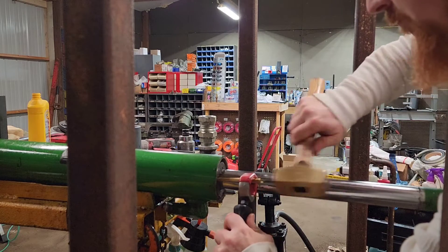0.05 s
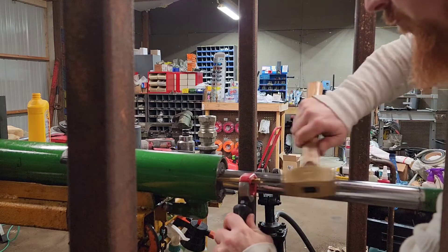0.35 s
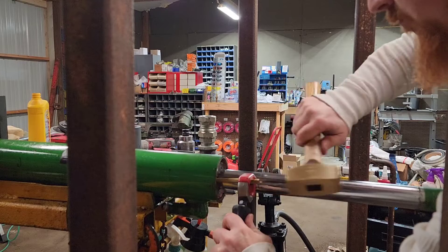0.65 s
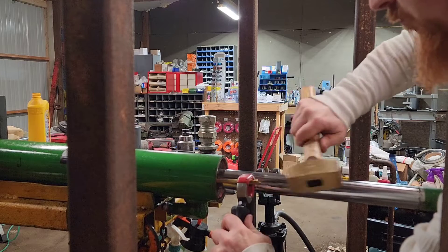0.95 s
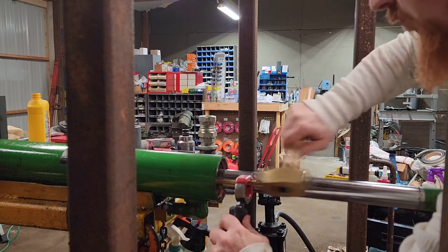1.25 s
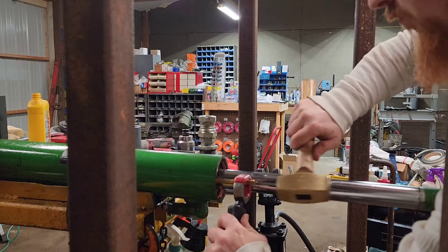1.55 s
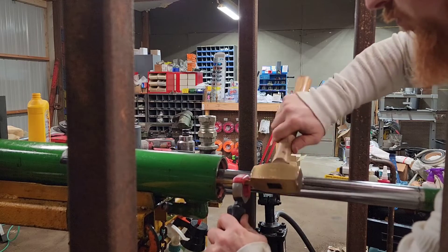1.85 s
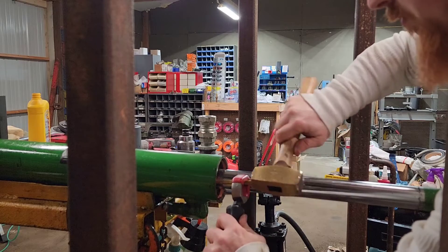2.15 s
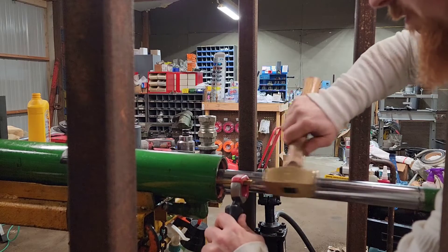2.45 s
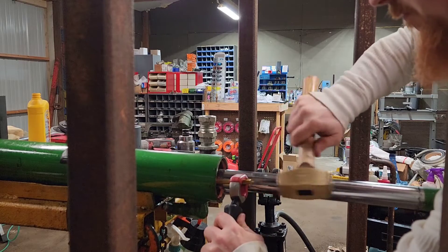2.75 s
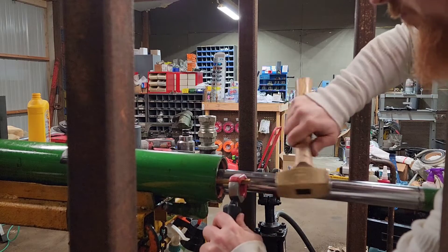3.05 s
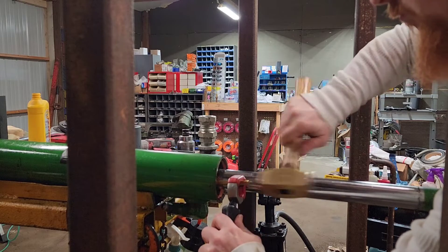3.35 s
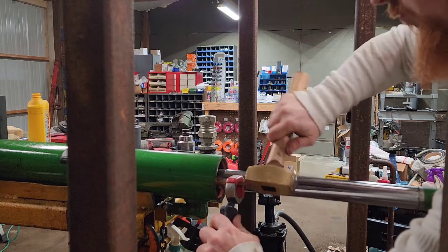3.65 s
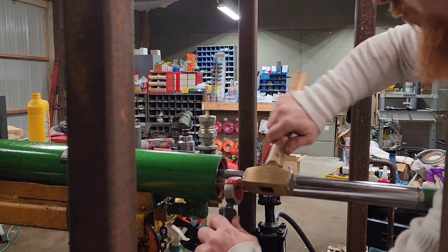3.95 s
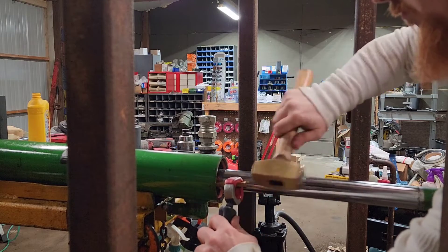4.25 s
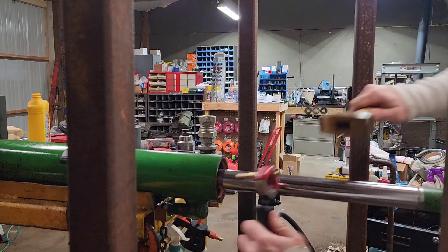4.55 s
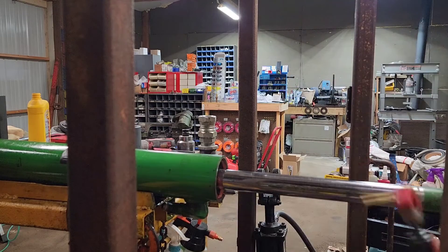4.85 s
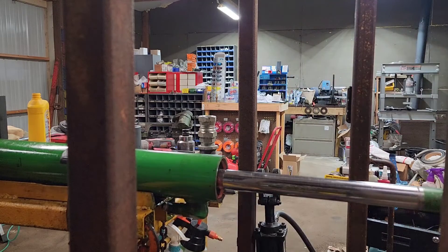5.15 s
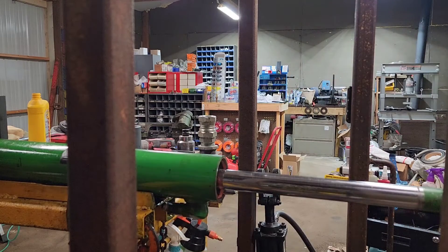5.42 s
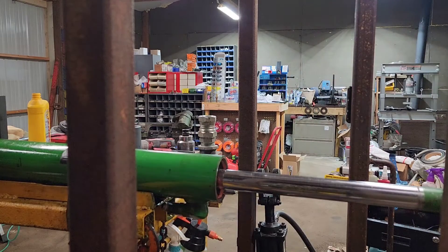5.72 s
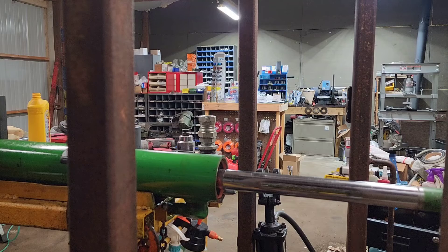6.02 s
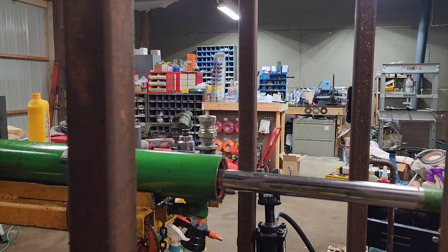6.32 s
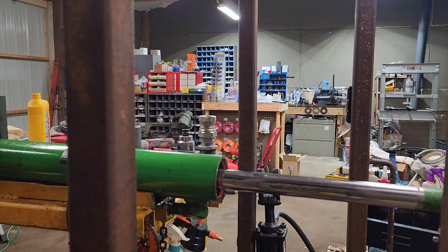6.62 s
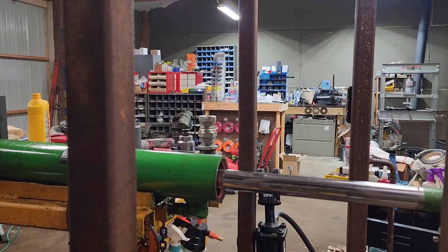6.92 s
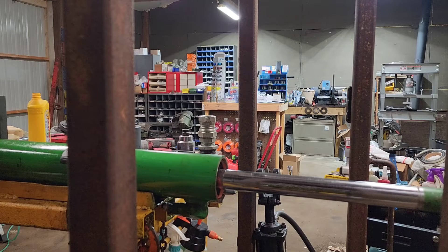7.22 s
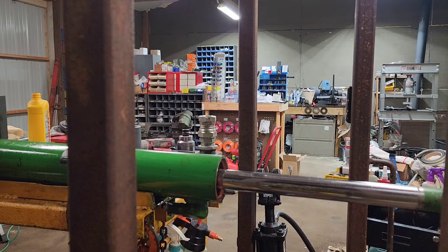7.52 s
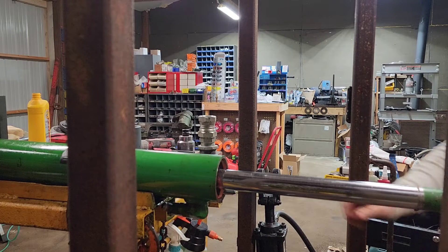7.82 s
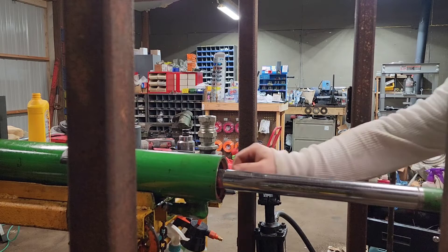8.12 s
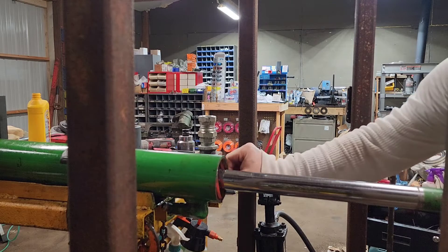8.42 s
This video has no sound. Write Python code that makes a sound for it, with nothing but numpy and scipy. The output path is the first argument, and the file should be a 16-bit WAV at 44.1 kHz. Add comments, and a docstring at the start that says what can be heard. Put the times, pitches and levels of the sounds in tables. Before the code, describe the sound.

A brass hammer strikes a hydraulic cylinder close in front of the microphone, about four blows a second, in two runs with a brief break. Each blow clacks and the steel rod pings, echoing in a hard-walled workshop. After a softer last tap it gets much quieter: off to the right, tools tap, the hammer knocks down on wood, feet shuffle and a hand rubs the rod over faint hiss.

```python
"""A hard-walled workshop, a stereo pair of microphones facing a hydraulic cylinder. A brass hammer
drives at its gland in two quick runs. A blow is a dull contact and, usually a moment later, a metallic
clack; the steel rod pings and the room answers. Then, off to the right and much quieter, tools are put
down, feet shuffle, and a hand rubs along the rod. Room tone and a fine hiss lie under it all."""
import sys
import numpy as np
from scipy import signal
from scipy.fft import rfft, irfft
from scipy.io import wavfile
from scipy.ndimage import uniform_filter1d

SR = 44100
rng = np.random.default_rng(int(sys.argv[2]) if len(sys.argv) > 2 else 0)


def digitize_waveform(pressure):
    """Quantize a signal to 16-bit integers and store it at the path in sys.argv[1].

    Rows of a 2-D input are taken as channels; values are limited to [-1, 1].
    """
    field = np.atleast_2d(pressure).T
    bounded = np.clip(field, -1, 1)
    quanta = np.round(bounded * 32767).astype(np.int16)
    wavfile.write(sys.argv[1], SR, quanta)


N = 382788
TIME = np.arange(32768) / SR  # seconds within one impact
HZ = np.fft.rfftfreq(len(TIME), 1 / SR)


def amp(db):
    """Decibels to gain."""
    return 10 ** (np.asarray(db) / 20)

def read(points, hz):
    """Each value column of a table, interpolated on a log-frequency axis."""
    f, *columns = np.transpose(points)
    return np.array([np.interp(np.log(hz + 1), np.log(f + 1), c) for c in columns])

def add(mix, s, sound):
    """Lays a stereo sound into the mix at s seconds; one that began before zero leaves only its tail."""
    start = round(s * SR)
    part, sound = mix[:, max(start, 0):], sound[:, max(-start, 0):]
    part[:, :sound.shape[1]] += sound[:, :part.shape[1]]

def unit(x):
    """Scales a sound to an rms of about 29.7, the square root of the number of samples in 20 ms."""
    return x / np.sqrt(np.sum(x ** 2) / len(x) / (SR / 50))

def fade(t60):
    """Exponential decay, 60 dB down after t60 seconds."""
    return np.exp(-np.log(1000) * TIME / t60)

def causal(gain):
    """Minimum-phase response for a magnitude: everything rings after the impact."""
    log_gain = np.log(np.maximum(gain, 1e-5))
    mirrored = np.concatenate([log_gain, log_gain[..., -2:0:-1]], -1)
    return np.exp(np.conj(signal.hilbert(mirrored)))[..., :len(HZ)]

# Diffuse sound at the two microphones. Each row: frequency in Hz, likeness from 0 to 1.
MIC_LIKENESS = [(60, 1), (250, 0.9), (500, 0.77), (850, 0.24), (1500, 0.02), (16000, 0.09)]
def noise(spectrum, size):
    """Coloured noise of rms 1, alike at both microphones in the bass and unrelated in the treble."""
    hz = np.fft.rfftfreq(size, 1 / SR)
    left, unrelated = rfft(rng.standard_normal((2, size)))
    same = read(MIC_LIKENESS, hz)[0]
    right = same * left + np.sqrt(1 - same ** 2) * unrelated
    pair = irfft(np.array([left, right]) * amp(read(spectrum, hz)), size)
    return pair / pair.std()

def burst(spectrum, rise_s, t60):
    """A crowd of modes too dense to tell apart, dying together."""
    return unit(noise(spectrum, len(TIME)) * fade(t60) * (1 - np.exp(-TIME / rise_s)))

def modes(table, scatter_db):
    """Dying sines; strength varies from hit to hit, and high ones reach the microphones out of step."""
    out = np.zeros((2, len(TIME)))
    for hz, db, t60 in table:
        skew = rng.uniform(-np.pi, np.pi) * (1 - read(MIC_LIKENESS, hz)[0])
        phase = 2 * np.pi * (hz * TIME + rng.random())
        out += amp(db + scatter_db * rng.standard_normal()) * fade(t60) * np.sin([phase, phase + skew])
    return out * (1 - fade(.004))

# How long the hard walls hold a sound. Each row: frequency in Hz, t60 in seconds.
WORKSHOP_T60 = [(60, 0.79), (160, 0.67), (400, 0.29), (1000, 0.49), (2000, 0.52), (3600, 0.47),
                (6000, 0.45), (11500, 0.25), (16000, 0.29)]
def reverb(spectrum, rise_s):
    """The workshop's diffuse tail builds up, each band dying at its own speed."""
    hz, t, bands = signal.stft(noise(spectrum, len(TIME)), SR, nperseg=256)
    decay = np.exp(-np.log(1000) * t / read(WORKSHOP_T60, hz).T)
    tail = signal.istft(bands * decay, SR, nperseg=256)[1]
    return unit(tail[:, :len(TIME)] * (1 - np.exp(-TIME / rise_s)))

def blow_force(bright_db, delay_s, clack_db, soft_hz=4100, hard_hz=3300, pivot_hz=1500, rebound_db=-8):
    """Spectra of the impacts in a blow: a soft contact, then the hard clack as the steel parts meet."""
    contact = causal(1 / np.sqrt(1 + (HZ / soft_hz) ** 14))
    clack = amp(rebound_db) + amp(clack_db) / (1 + (hard_hz / (HZ + 1)) ** 4)
    tilt = causal(amp(bright_db * .5 * np.tanh(2 * np.log((HZ + 1) / pivot_hz))))
    if delay_s < .001:  # parts already touch: one impact
        return [tilt * causal(np.hypot(abs(contact), clack))]
    delay = np.exp(-2j * np.pi * HZ * round(delay_s * SR) / SR)
    return [tilt * contact, tilt * causal(clack) * delay]

# Straight from the struck parts to the microphones. Each row: frequency in Hz, left and right in dB.
CRACK_SPECTRUM = [(63.8, -37, -41), (256, -5.5, -11.5), (648, -20.5, -14), (1130, 3, -12.5),
                  (1570, -2, -17.5), (2000, -1, 4.5), (2750, -18.5, -8.5), (3690, -14, -2),
                  (5180, -15, -28), (7430, -15.5, -25), (9200, -34.5, -38), (11200, -9.5, -1),
                  (13786, -14.5, -10), (15240, -28, -9.5)]
def crack(spread_s=0.001294, knee_hz=900, blunt_hz=6500):
    """Direct sound of a blow; bending waves cross the steel faster the higher their pitch."""
    lateness = spread_s / np.sqrt(1 + HZ / knee_hz)
    dispersion = np.exp(-2j * np.pi * np.cumsum(lateness - lateness[-1]) * HZ[1])
    blunt = 1 / np.sqrt(1 + (HZ / blunt_hz) ** 4)
    return unit(irfft(causal(amp(read(CRACK_SPECTRUM, HZ)) * blunt) * dispersion))

# The cylinder's modes. Each row: frequency in Hz, level in dB, t60 in seconds.
BARREL_MODES = [(158.1, -7.5, 0.72), (269, -12, 0.46), (543, -9, 0.45), (698, -10, .4), (729, -7, 0.58),
                (848, -8, 0.32), (928, -12.5, .45), (1070, -5, 0.34), (1117, -7.5, 0.42), (1380, -2, 0.35),
                (1520, -6, 0.56), (3424, -10.5, 0.74), (3573, -13, .45), (5440, -21, .3)]  # barrel and stand
ROD_MODES = [(1982, 0.5, 0.08), (1975, -12, 0.43), (1216, -6.5, 0.16), (355.6, -14, 0.082),
             (2300, -4.5, 0.036), (3617, -8.5, .04)]
# The rod's lingering ring, blurred by the room. Each row: frequency in Hz, level in dB.
ROD_SPECTRUM = [(1500, -37), (1850, -19.5), (1945, 2), (1970, 12), (2020, -13.5), (2120, -13), (2700, -50)]
# The rod rings more freely as the gland is driven along it. Each row: time in seconds, gain in dB.
ROD_GAIN = [(2.45, -8), (2.95, 2.5), (3.5, 4.5), (3.78, 10.5), (4.32, 5.5)]
def cylinder_ring(s):
    """Barrel and rod ring on after a blow at s seconds."""
    ping = amp(-20) * modes(ROD_MODES, scatter_db=2)
    linger = amp(-32) * burst(ROD_SPECTRUM, rise_s=0.0043, t60=.4)
    freedom = amp(np.interp(s, *np.transpose(ROD_GAIN)))
    return amp(-31) * modes(BARREL_MODES, scatter_db=2.24) + freedom * (ping + linger)

# Blows in front of the microphones, the first already dying away. Each row: start in seconds, force in
# dB, brightness in dB, clack delay in seconds, clack in dB, direct sound in dB, bite in dB.
HAMMER_BLOWS = [(-.18, 1, 0, 0.0025, 0, -3, -5), (0.0835, 2.5, 2, 0.0017, -3, -6.5, 5),
                (0.3725, -1, -1.5, 0.00024, -15, 2, -1.5), (0.6299, 1, 1.5, 0, -0.5, -2.5, -6),
                (0.889, 0, 1.5, 0, -4, -1, -2), (1.1414, -0.5, 1.5, 0.0017, -6.5, 1, -3.5),
                (1.3896, 1, 2, 0.004, -2, 1.5, 7), (1.9576, -3, 0.8, 0, -6.5, 2, -6),
                (2.219, 0, 2, 0.0008, -1, 1.5, 1), (2.473, 0, 2.5, 0.0021, 2, -1.5, 5),
                (2.7289, -1, 2, 0.0036, 1, 2, -1), (2.9852, -1, 0, .0070, -1, 2.5, 5),
                (3.2419, -3, -1.5, 0, 4.5, -2, -8.5), (3.505, -1.5, 5, 0.0011, -7.5, 2.5, 1),
                (3.7684, -1, 2.5, 0.0075, -2, 3.5, 1), (4.038, -2.5, 0.5, 0.0011, -2.5, -2, -1.5),
                (4.322, -10.5, 0, 0.002, -26, 8, -2)]
# Stiff, damped modes of hammer head and gland. Each row: frequency in Hz, level in dB, t60 in seconds.
HEAD_MODES = [(698, -14, 0.067), (1043, 4, 0.12), (1310, -12, 0.057), (1532, -8, 0.07), (2350, -10, 0.029),
              (2390, 1.5, 0.032), (3380, -30, 0.014)]
# A blow's noise, from near to far. Each row: frequency in Hz, left and right microphone in dB.
CHATTER_SPECTRUM = [(198, -15.5, -8), (1135, 0, -7.5), (2110, 4.5, 5), (3650, -7, -9.5), (5040, -11, -18),
                    (10000, -22, -25), (11120, -11.5, -8), (15700, -28, -18)]  # the faces, just after they meet
CLATTER_SPECTRUM = [(60.0, -25.5, -27.5), (200.0, -8, -16.5), (590, -12, -16), (810, -6.5, -28),
                    (1130, 2.5, 2), (1610, 1.5, -18.5), (2040, -2, -1.5), (2740, -22, -10),
                    (3830, -16, -13), (4940, -10, -21), (10040, -32, -33), (11270, -12.5, -6.5),
                    (12900, -31, -27), (15370, -34, -26)]  # gland, barrel and nearby surfaces
ECHO_SPECTRUM = [(38.7, -22, -14.5), (68.6, -15, -15), (185, -5.5, -7), (395, -6, -8.5), (639, -4.5, -4),
                 (754, 2, -1), (1110, 0.5, -0.5), (1780, -11, -7), (1950, -3, -2), (2900, -13, -9.5),
                 (3660, -11, -6.5), (4770, -15.5, -23), (9500, -31, -30.5), (11370, -18, -12.5),
                 (15670, -45.5, -26)]  # the workshop's answer
def hammering(bite_hz=3060, bite_octaves=.22, echo_repeat=.7):
    """Brass strikes the gland: each impact drives crack, clatter and room, and the cylinder rings."""
    out = np.zeros((2, N))
    # contact and clack sound from different places, each with its own echo
    spot_echoes = [reverb(ECHO_SPECTRUM, rise_s) for rise_s in (0.0035, 0.0053)]
    fade_out = np.clip((.7 - TIME) / .1, 0, 1)
    # bite: a narrow band that is strong or weak with the spot that is struck
    bite_band = np.exp(-(np.log2((HZ + 1) / bite_hz) / bite_octaves) ** 2)
    for s, force_db, bright_db, delay_s, clack_db, direct_db, bite_db in HAMMER_BLOWS:
        directness = causal(amp(direct_db + bite_db * bite_band))
        impacts = blow_force(bright_db, delay_s, clack_db - force_db)
        for force, spot_echo in zip(impacts, spot_echoes):
            # the hammer lands near the same spot, so the echo pattern partly repeats
            fresh_echo = reverb(ECHO_SPECTRUM, rise_s=0.0033)
            echo = echo_repeat * spot_echo + np.sqrt(1 - echo_repeat ** 2) * fresh_echo
            chatter = amp(-23) * burst(CHATTER_SPECTRUM, rise_s=0.0006, t60=0.018)
            head = amp(-22) * modes(HEAD_MODES, scatter_db=2.8)
            clatter = amp(-21) * burst(CLATTER_SPECTRUM, rise_s=0.00039, t60=0.19)
            near = directness * rfft(amp(-21) * crack() + chatter + head)
            far = rfft(clatter + amp(-19) * echo)
            add(out, s, amp(force_db) * fade_out * irfft((near + far) * force))
        add(out, s, amp(force_db) * cylinder_ring(s))
    return out

# The quiet workshop, all round the microphones. Each row: frequency in Hz, relative level in dB.
AIR_SPECTRUM = [(15, -15), (25, -1), (92, -3), (217, -13.5), (405, -10.5), (840, -10), (1070, -12),
                (1790, -3), (2840, -15), (3620, -9.5), (5880, -15), (7710, -8), (8830, -19.5), (11900, 1.5),
                (16000, -10)]
def room_tone(split_hz=5500, tone_db=-52.5, hiss_db=-61, lift_db=3, lift_at_s=5.5, lift_length_s=0.2):
    """Steady room tone below; above it a fine hiss that comes up once and stays."""
    air = noise(AIR_SPECTRUM, N)
    tone = signal.sosfiltfilt(signal.butter(2, split_hz, fs=SR, output="sos"), air)
    lift = np.clip((np.arange(N) / SR - lift_at_s) / lift_length_s, 0, 1)
    return tone * amp(tone_db) + (air - tone) * amp(hiss_db + lift_db * lift)

# Small metal parts, off to the side. Each row: start in seconds, level in dB.
METAL_CLICKS = [(1.89, -63.5), (7.507, -57.5), (7.537, -49), (7.7732, -48), (8.245, -48), (8.247, -48),
                (8.462, -51.5)]
# Their tick. Each row: frequency in Hz, level in dB.
CLICK_SPECTRUM = [(400, 10.5), (1500, -6.5), (2400, 2), (3700, 0.5), (5500, -2), (9000, -25.5),
                  (12000, -11), (16000, -14)]
# Their ring. Each row: frequency in Hz, level in dB, t60 in seconds.
PART_MODES = [(2580, -6, 0.065), (3920, -3, .08), (5360, -1, .09)]
def clicks(gain_db=2):
    """Metal parts touch: a sharp tick, a brief ring and a short echo."""
    out = np.zeros((2, N))
    for s, db in METAL_CLICKS:
        tick = burst(CLICK_SPECTRUM, rise_s=0.0001, t60=.014)
        ring = amp(-7) * modes(PART_MODES, scatter_db=3.2)
        echo = amp(-12) * reverb(CLICK_SPECTRUM, rise_s=0.0036)
        add(out, s, amp(db + gain_db) * (tick + ring + echo))
    return out

# A floor thud, a hollow knock and a small tick. Each row: frequency in Hz, level in dB.
THUD_SPECTRUM = [(25, -60), (45, -45), (72, -7), (110, -20), (135, -10.5), (158, 3.5), (195, -16),
                 (255, -11), (340, -21), (600, -46.5)]
KNOCK_SPECTRUM = [(40, -41), (100, -24), (230, -10), (340, -6.5), (520, -5), (750, -8.5), (1100, -14.5),
                  (1600, -18.5), (4000, -63.5)]
TICK_SPECTRUM = [(500, -18.5), (1500, 5.5), (3600, 3), (5500, -5), (9000, -17), (12000, -18), (16000, -48)]
def bump(thud_db, knock_db, tick_db, rise_s, t60):
    """A soft impact: thud, hollow knock and tick, each with its echo."""
    parts = ((THUD_SPECTRUM, thud_db), (KNOCK_SPECTRUM, knock_db), (TICK_SPECTRUM, tick_db))
    return sum(amp(db) * (burst(spectrum, rise_s, t60) + amp(-9) * reverb(spectrum, rise_s=0.014))
               for spectrum, db in parts)

# Handling beside the microphones. Each row: start in seconds, knock in dB, tick in dB.
TOOL_TAPS = [(4.61, -47, -54.5), (4.635, -49.5, -53.5), (4.853, -57, -71), (5.653, -47.5, -49.5),
             (6.038, -50, -68), (6.198, -55, -60), (6.584, -41.5, -55.5), (7.211, -53, -64.5),
             (7.776, -52, -46), (8.237, -39.5, -45)]
def taps(thud_offset_db=-11.5):
    """Tools and hand knock lightly against things."""
    out = np.zeros((2, N))
    for s, knock_db, tick_db in TOOL_TAPS:
        add(out, s, bump(knock_db + thud_offset_db, knock_db, tick_db, rise_s=0.0032, t60=0.25))
    return out

# Soles, sleeve and hand, faint. Each row: start in seconds, length in seconds, peak level in dB.
RUB_STROKES = [(5.491, 0.31, -56.5), (6.42, .15, -56.5), (7.106, 0.28, -55), (8.2, 0.2, -53),
               (8.32, 0.26, -46.5), (8.616, 0.16, -57.5)]
# Their sliding. Each row: frequency in Hz, level in dB.
RUB_SPECTRUM = [(50, -11), (200, -9), (550, 0.5), (900, -6.5), (1500, -8), (3000, -11.5), (5000, -15),
                (9000, -26.5), (16000, -21.5)]
def rubbing(fastest_at=0.41):
    """Sliding friction follows the speed: each stroke quickens, then comes to rest."""
    t = np.arange(N) / SR
    strokes = sum(amp(db) * np.interp((t - s) / length, [0, fastest_at, 1], [0, 1, 0])
                  for s, length, db in RUB_STROKES)
    return noise(RUB_SPECTRUM, N) * strokes

# Feet off to the side, heel and sole apart. Each row: start in seconds, thud in dB, shoe knock in dB.
FOOTFALLS = [(6.418, -55.5, -54), (6.473, -48, -48.5), (7.312, -39.5, -44.5), (7.397, -48, -67),
             (7.487, -33, -39), (7.503, -27.5, -32), (7.577, -39.5, -49), (7.861, -57.5, -53.5)]
# The floor and what stands on it. Each row: frequency in Hz, level in dB, t60 in seconds.
FLOOR_MODES = [(136.7, -4, 0.47), (158.9, -2.5, 0.5), (256, -8, 0.2), (344, 0, .22), (3990, -22, .35)]
def steps(rise_s=0.0028, floor_db=-3, grit_db=-12):
    """A shoe knocks, the grit under it ticks, and the floor booms and rattles."""
    out = np.zeros((2, N))
    for s, thud_db, knock_db in FOOTFALLS:
        foot = bump(thud_db + floor_db, knock_db, knock_db + grit_db, rise_s, t60=0.43)
        boom = amp(thud_db + floor_db) * modes(FLOOR_MODES, scatter_db=1.2)
        add(out, s, foot + boom * (1 - np.exp(-TIME / rise_s)))
    return out

# The hammer put down, off to the side. Each row: start in seconds, level in dB.
HAMMER_LANDINGS = [(6.609, -1), (6.6155, 2.5), (6.6201, -1.5), (6.6295, -14)]
# The wooden surface under it. Each row: frequency in Hz, level in dB, t60 in seconds.
WOOD_MODES = [(172.8, -20, 0.53), (334, -2, 0.076), (388, 5, 0.098), (514, -1.5, 0.33), (554, 0, 0.15),
              (670, -1, 0.069), (772, -2.5, 0.14), (900, -8, 0.2), (1034, -5.5, 0.15), (1416, -15, .25),
              (1990, -14, 0.13), (2665, -13.5, 0.084), (3340, -13, .16), (3550, -10, 0.047)]
# The wood's broad knock. Each row: frequency in Hz, level in dB.
WOOD_SPECTRUM = [(35, -60), (65, -29), (110, -15.5), (250, -15), (400, -4), (650, 1.5), (950, -8.5),
                 (1500, -7.5), (2400, -21.5), (3600, -22), (7000, -39.5), (15000, -38)]
def set_down():
    """The hammer head lands and rocks on wood, which knocks and rings into the room."""
    out = np.zeros((2, N))
    for s, db in HAMMER_LANDINGS:
        knock = amp(-28) * burst(WOOD_SPECTRUM, rise_s=0.00026, t60=0.11)
        ring = amp(-28) * modes(WOOD_MODES, scatter_db=4.2)
        echo = amp(-29) * reverb(WOOD_SPECTRUM, rise_s=0.024)
        add(out, s, amp(db) * (knock + ring + echo))
    return out

def scene(left_lag_samples=11, left_db=1.0):
    """Hammering in front; the handling noises come from one side and reach the left microphone later."""
    aside = clicks() + taps() + rubbing() + steps() + set_down()
    aside[0] = np.roll(aside[0], left_lag_samples) * amp(left_db)
    return hammering() + room_tone() + aside

def record(dry, low_cut_hz=40, high_cut_hz=16100, ceiling=.95):
    """The microphones shed deep bass, round off the highest peaks and lose the very top of the treble."""
    dry = signal.sosfilt(signal.butter(2, low_cut_hz, "high", fs=SR, output="sos"), dry)
    rounded = dry / (1 + (dry / ceiling) ** 6) ** (1 / 6)
    high_cut = signal.firwin(301, high_cut_hz, window=("kaiser", 9), fs=SR)
    return signal.oaconvolve(rounded, high_cut[None], "same")


dry = scene()
out = record(dry)
digitize_waveform(out)
```